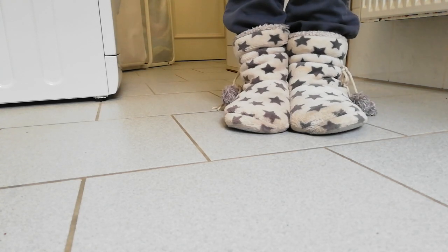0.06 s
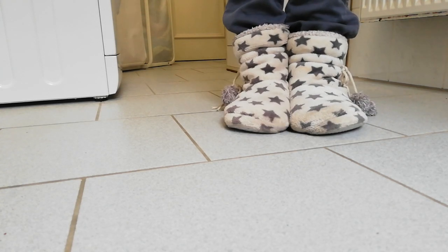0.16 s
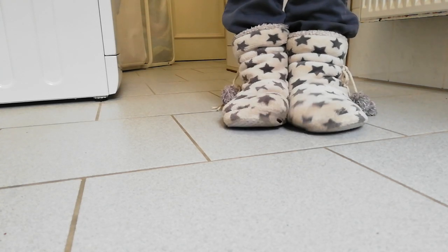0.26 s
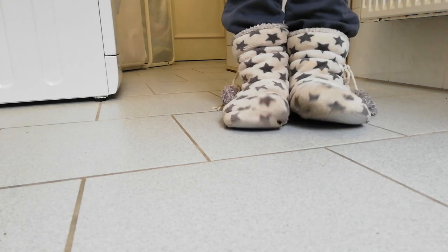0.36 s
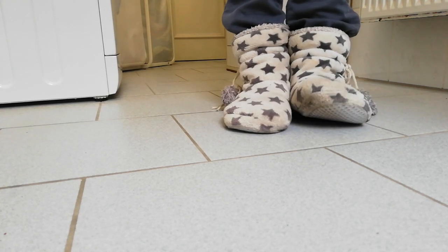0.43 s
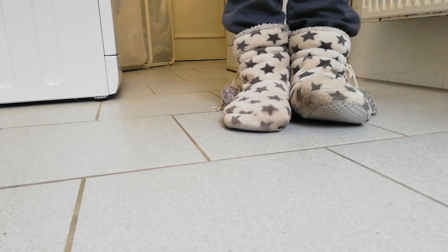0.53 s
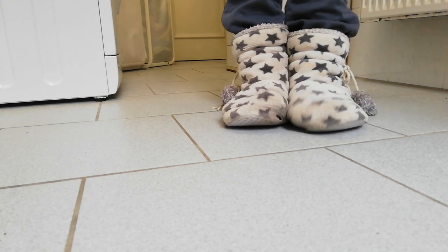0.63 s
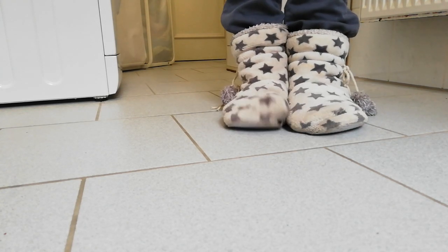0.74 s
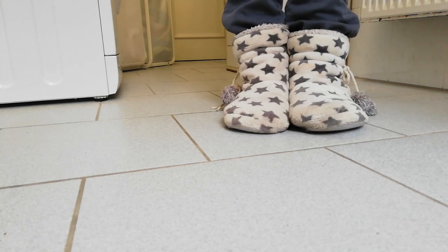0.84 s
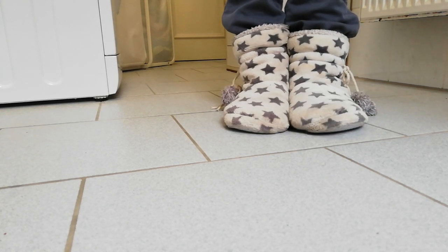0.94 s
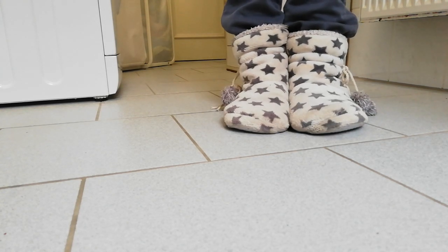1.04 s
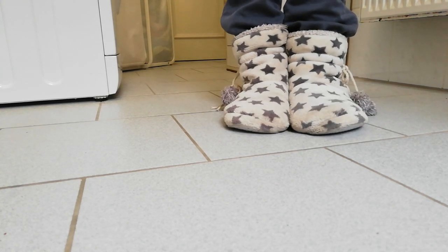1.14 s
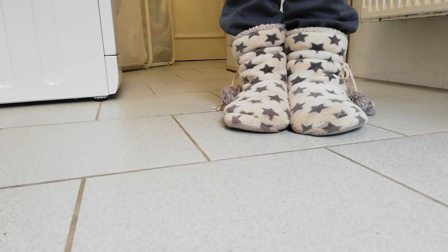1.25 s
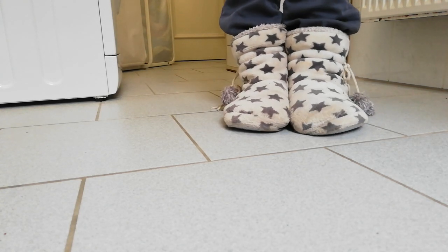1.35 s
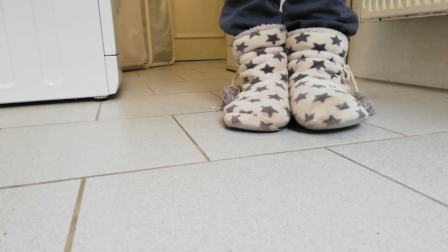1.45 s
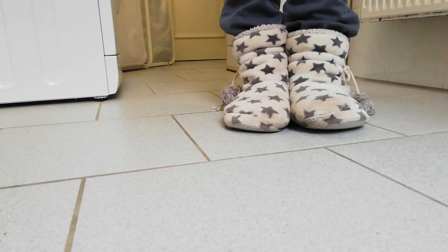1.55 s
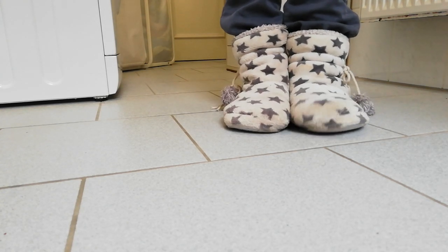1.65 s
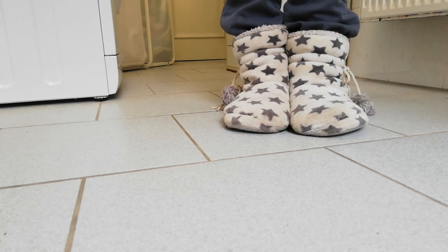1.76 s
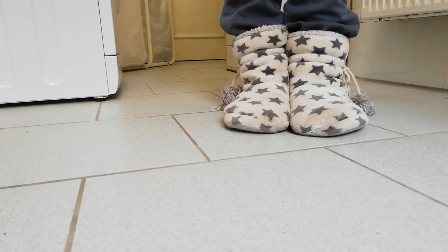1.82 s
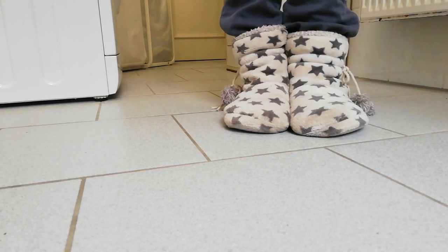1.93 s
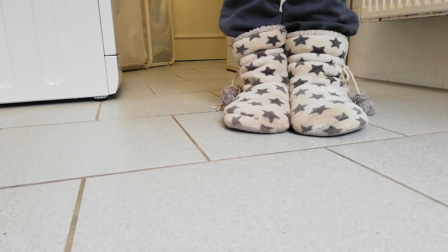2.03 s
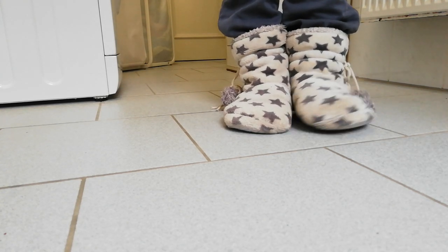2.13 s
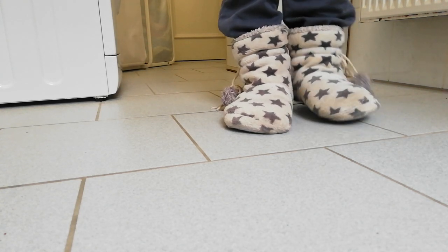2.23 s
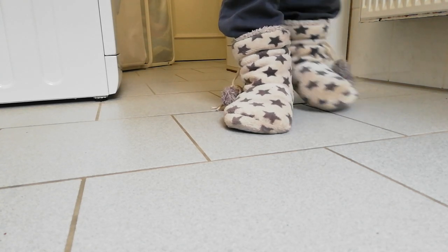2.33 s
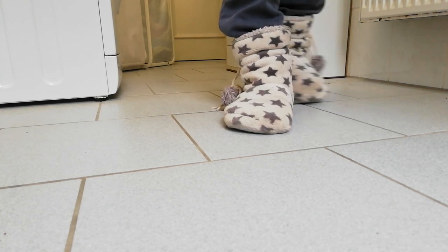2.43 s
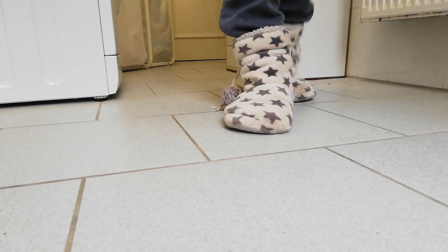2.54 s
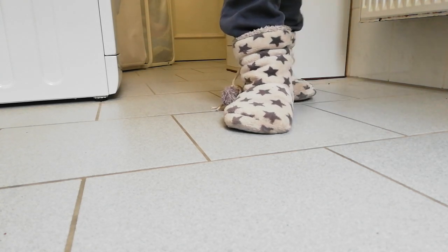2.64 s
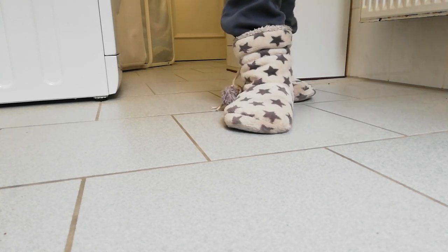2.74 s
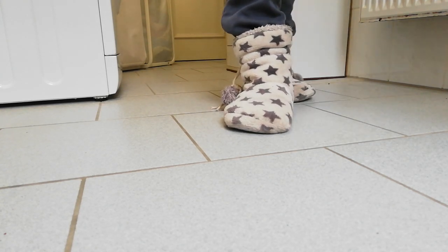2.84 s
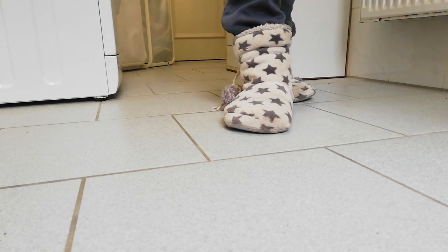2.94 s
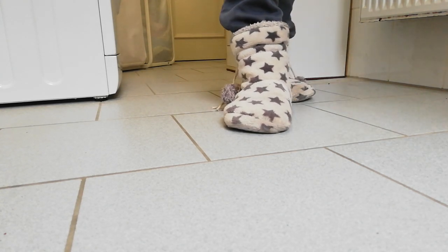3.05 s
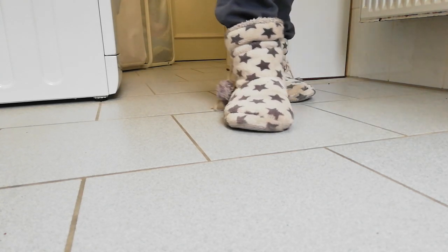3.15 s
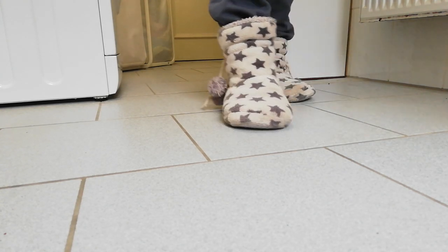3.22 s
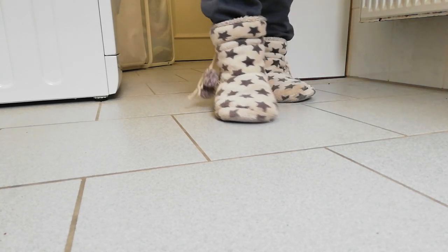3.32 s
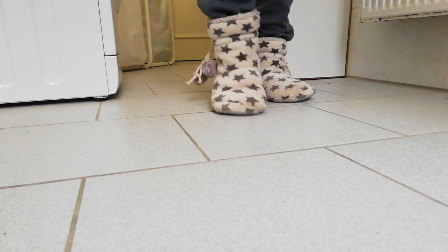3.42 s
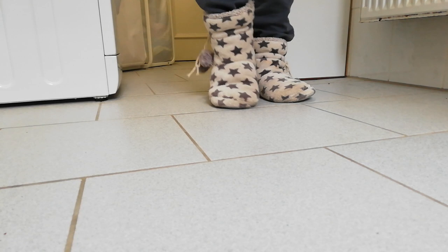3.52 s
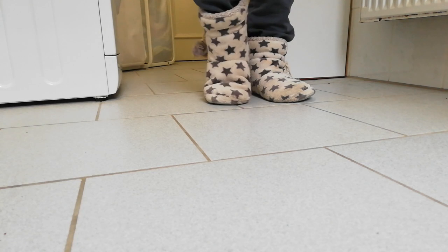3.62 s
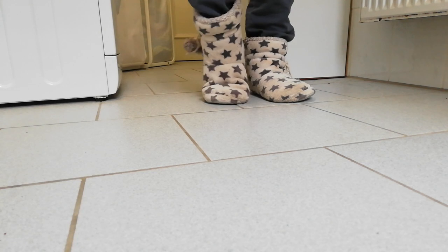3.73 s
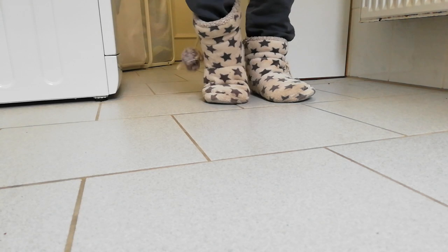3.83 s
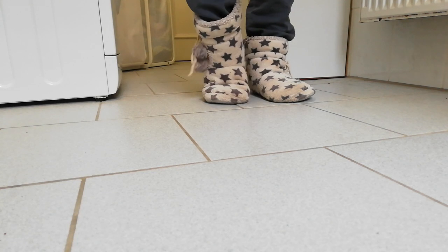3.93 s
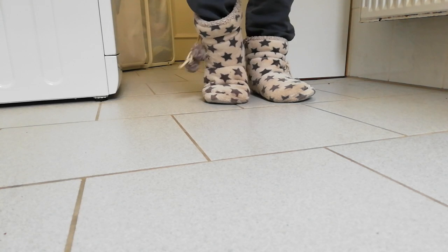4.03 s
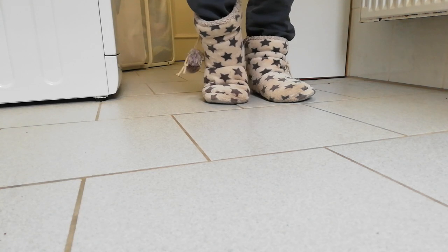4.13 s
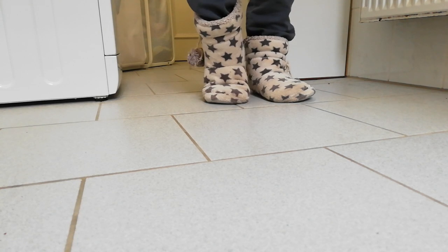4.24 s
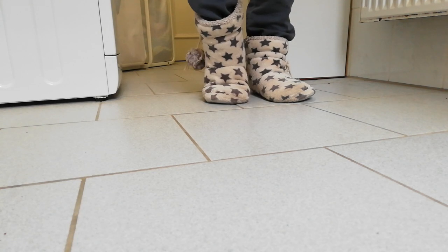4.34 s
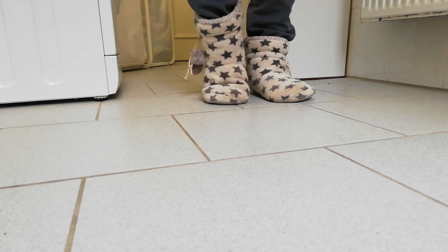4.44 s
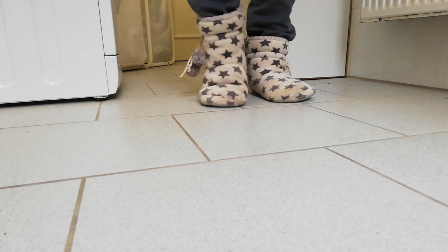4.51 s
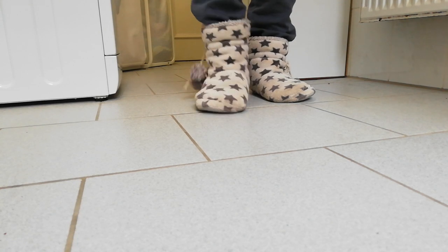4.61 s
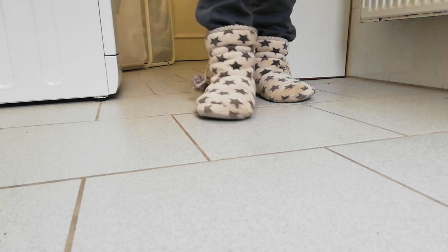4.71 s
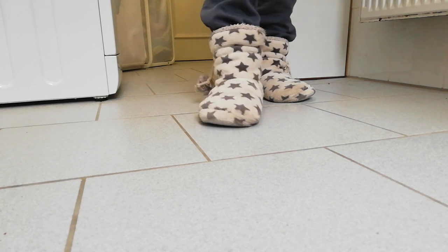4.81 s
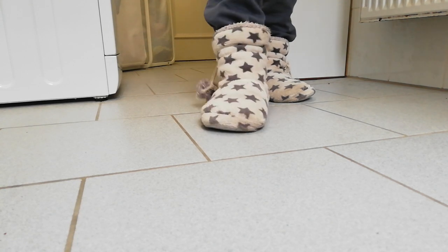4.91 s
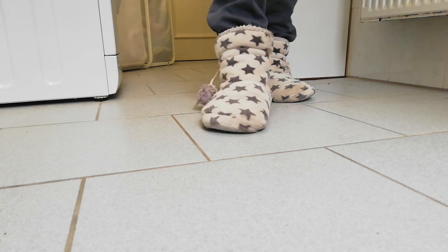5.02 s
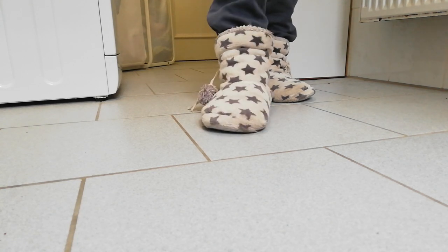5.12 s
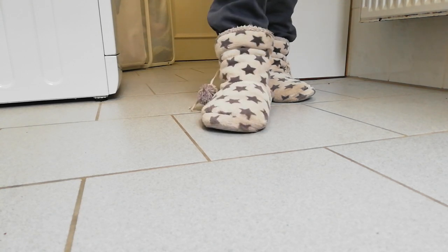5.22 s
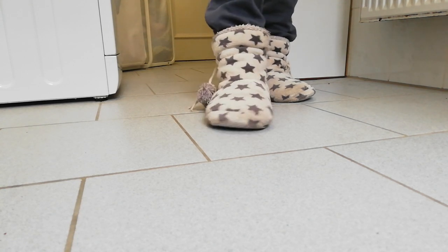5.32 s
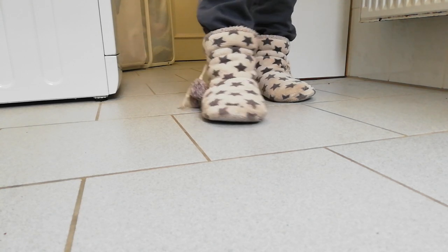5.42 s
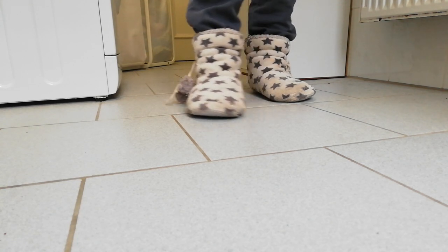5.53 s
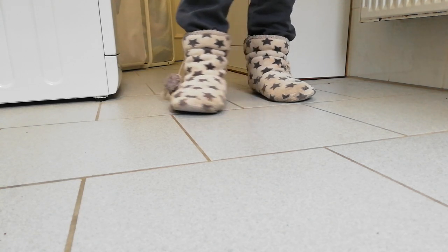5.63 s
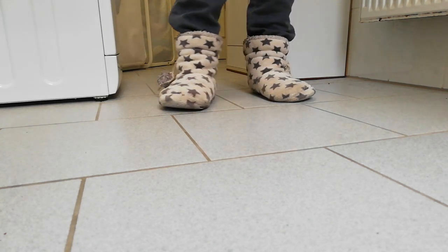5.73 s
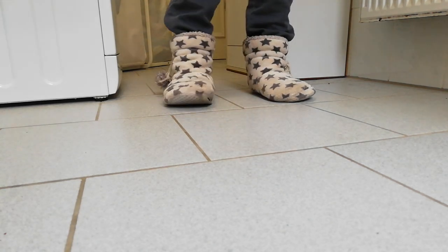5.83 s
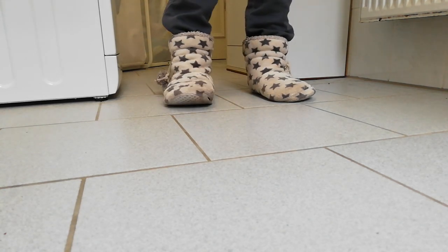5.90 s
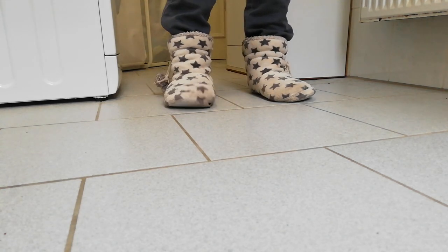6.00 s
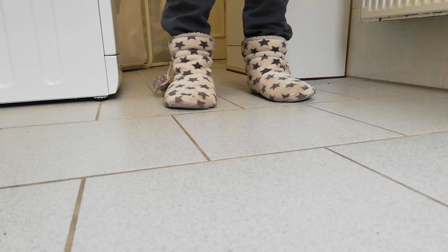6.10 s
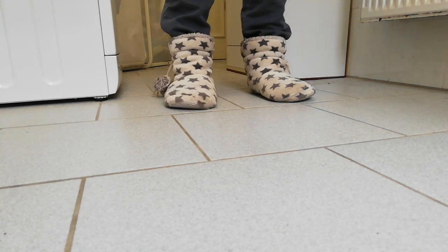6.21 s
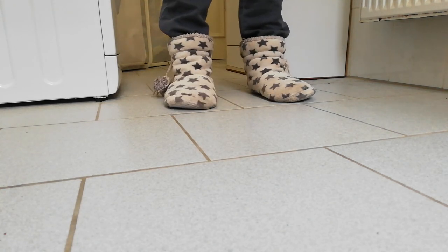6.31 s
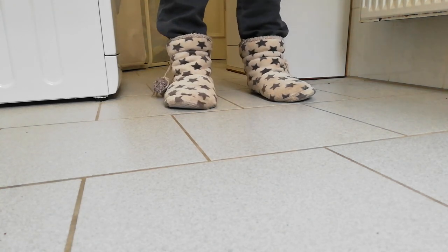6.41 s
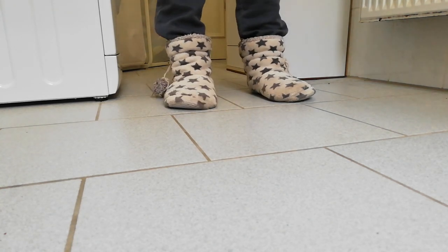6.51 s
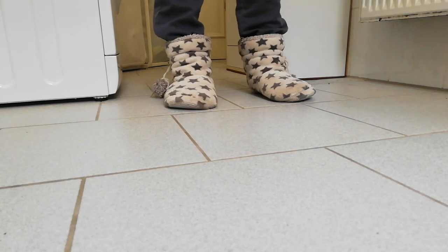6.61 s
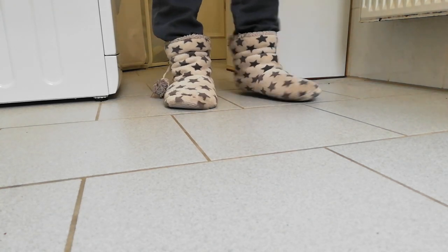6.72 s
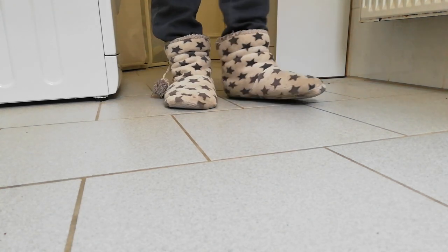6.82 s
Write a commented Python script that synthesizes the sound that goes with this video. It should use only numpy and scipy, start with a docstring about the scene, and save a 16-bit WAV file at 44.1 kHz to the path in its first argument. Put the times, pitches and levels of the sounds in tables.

```python
"""An appliance hums under steady air noise in a small hard room with ceramic tiles.
Soft boots with studded rubber soles shift and tap their toes, drag briefly, then one heel thuds at 2.6 s.
Longer slides follow from 3.2 to 6 s, while a faint second tone swells around 4 s; a last drag starts at 6.7 s.
Friction is thousands of random stud slips a second; taps and snapping studs are short dying rings.
A pair of microphone ports lies near the floor, each with a colour of its own."""
import sys
import numpy as np
from scipy import signal
from scipy.fft import rfft, irfft
from scipy.io import wavfile

SR = 44100
rng = np.random.default_rng(int(sys.argv[2]) if len(sys.argv) > 2 else 0)


def natural_amplitude(level_db):
    """Convert a level in decibels to a linear amplitude factor, elementwise."""
    exponent = np.asarray(level_db, float) / 20
    return 10 ** exponent


def unload_audio(sound):
    """Save the sound as a 16-bit wav file, at the path given as the first command line argument."""
    columns = np.transpose(np.atleast_2d(sound))
    # keep every value between -1 and 1, then stretch to whole-number steps
    steps = np.round(np.clip(columns, -1, 1) * 32767)
    wavfile.write(sys.argv[1], SR, steps.astype(np.int16))


N = 302526  # samples
HZ = np.arange(N // 2 + 1) * SR / N + 1e-3  # spectrum bins, kept above zero for the logarithm
LEFT_RIGHT = np.array([[.5], [-.5]])  # shares a left-right dB difference between the ports


def rms_one(x):
    """Scale to rms 1."""
    return x / np.sqrt(np.mean(x ** 2) + 1e-20)


def at_hz(points, hz):
    """Read a table along log frequency."""
    points_hz, values = np.transpose(points)
    return np.interp(np.log(hz), np.log(points_hz), values)


def coloured(x, gain):
    """Give a steady signal a spectrum."""
    return irfft(rfft(x) * gain, N)


def resonance(hz, width_hz):
    """Spectral bump of height 1 around one mode."""
    return 1 / (1 + (2 * (HZ - hz) / width_hz) ** 2)


def drift(rate_hz):
    """Slow random wander of rms 1."""
    return rms_one(coloured(rng.standard_normal(N), 1 / (1 + (HZ / rate_hz) ** 2)))


def ring(length, hz, t60):
    """A sine whose envelope starts at 1 and falls 60 dB in t60 seconds."""
    t = np.arange(length) / SR
    return np.sin(2 * np.pi * hz * t) * natural_amplitude(-60 * t / t60)


def room_tone(mid_db=-65.5):
    """Steady air and microphone noise: alike in the bass, changing in likeness with pitch above."""
    # Spectrum of the air. Each row: frequency in Hz, relative level in dB.
    air = [(20, -10.5), (49, -9.5), (70, -7.5), (90, -14.5), (126, -14), (252, -16.5), (383, -23),
           (492, -27), (908, -26.5), (1150, -23.5), (2000, -26.5), (4080, -30), (7750, -29), (11000, -33),
           (15600, -40.5)]
    # How alike the ports are. Each row: frequency in Hz, left-right correlation from -1 to 1.
    likeness = [(60, 0.96), (130, 0.78), (290, 0.16), (640, -0.78), (1410, 0.42), (3100, -0.2),
                (6820, 0.04), (15000, -0.03)]
    alike = np.clip(at_hz(likeness, HZ), -.99, .99)
    colour = natural_amplitude(at_hz(air, HZ))
    mid, side = rng.standard_normal((2, N))
    mid = coloured(mid, colour)
    side = coloured(side, colour * np.sqrt((1 - alike) / (1 + alike)))
    return natural_amplitude(mid_db) * (mid + side * [[1], [-1]]) / np.std(mid)


def rumble():
    """Low noise in the room's modes."""
    # Each row: mode in Hz, width in Hz, level in dB rms.
    modes = [(99.76, 11, -73), (54, 8, -80), (68, 8, -85), (120.5, 8, -82.5)]
    out = 0
    for hz, width_hz, db in modes:
        noise = coloured(rng.standard_normal(N), resonance(hz, width_hz))
        out = out + natural_amplitude(db) * rms_one(noise)
    return out


def hum(mains_hz=100.27, mains_db=-66, wander_rad=0.1):
    """A steady appliance tone that beats with the rumble around it, and a second that comes and goes."""
    # The faint second tone: centre in seconds, half length in seconds, pitch in Hz, level at centre in dB rms.
    passing_tone = (4, .55, 121.5, -71)
    centre_s, half_s, tone_hz, tone_db = passing_tone
    t = np.arange(N) / SR
    mains = natural_amplitude(mains_db) * np.sin(2 * np.pi * mains_hz * t)
    swell_db = tone_db - 20 * ((t - centre_s) / half_s) ** 4
    passing = natural_amplitude(swell_db) * np.sin(2 * np.pi * tone_hz * t + wander_rad * drift(3))
    return np.sqrt(2) * (mains + passing) + rumble()  # rms to peak


def thud(rise_s=.015):
    """The slab swings up slowly and dies; both ports hear it alike."""
    # Heel on the floor slab, then the weight settling.
    # Each row: start in seconds, level in dB before the soft rise, pitch in Hz, time to fall 60 dB in seconds.
    slab_blows = [(2.625, -42.5, 55, .17), (2.675, -46.5, 54, .3)]
    out = np.zeros(N)
    rise = 1 - np.exp(-np.arange(SR) / SR / rise_s)
    for s, db, hz, t60 in slab_blows:
        at = round(s * SR)
        out[at:at + SR] += natural_amplitude(db) * ring(SR, hz, t60) * rise
    return out


def toe_knocks(cycles=5.9):
    """Toe taps: each knock falls 60 dB within the same number of cycles, so high ones are shorter."""
    # Each row: start in seconds, level in dB before room and ports, pitch in Hz, left-right dB.
    toe_taps = [(0.6498, -46, 2000, -2), (.671, -40, 1100, 0), (1.436, -39, 1800, 7.5),
                (1.6158, -36, 1010, 1), (2.1772, -35.5, 2800, -9), (2.569, -29.5, 1720, 4.5),
                (2.572, -33, 1980, -19), (6.7039, -29, 4000, 0)]
    return [(s, db, hz, cycles / hz, pan_db) for s, db, hz, pan_db in toe_taps]


def tile_knocks(t60=0.027):
    """The tile answers a flat landing lower and longer."""
    # Each row: start in seconds, level in dB before room and ports, pitch in Hz.
    landings = [(1.6144, -45, 480), (2.569, -46.5, 292)]
    return [(s, db, hz, t60, 0) for s, db, hz in landings]


def stud_ticks(t60=0.0021):
    """Single studs snap free with a very short high ring."""
    # Each row: start in seconds, level in dB before room and ports, pitch in Hz, left-right dB.
    snaps = [(1.383, -34.5, 8200, -9), (1.4386, -27, 8300, -9.5), (1.477, -30.5, 8800, -13.5),
             (2.187, -30, 7000, 2), (2.62, -33, 6000, -5), (2.637, -23, 7500, 4), (3.3147, -16.5, 7000, 6),
             (3.8715, -46, 7500, 2), (4.5273, -21, 6000, 0), (5.4257, -15.5, 6900, 6),
             (5.4953, -22, 6500, -3)]
    return [(s, db, hz, t60, pan_db) for s, db, hz, pan_db in snaps]


def taps(rubber_hz=11000):
    """Knocks and ticks as dying rings, the pressure dropping first; soft rubber rounds the edge."""
    out, length = np.zeros((2, N)), 1500
    for s, db, hz, t60, pan_db in toe_knocks() + tile_knocks() + stud_ticks():
        at = round(s * SR)
        out[:, at:at + length] -= ring(length, hz, max(t60, .0005)) * natural_amplitude(db + pan_db * LEFT_RIGHT)
    rubber = signal.butter(4, rubber_hz, fs=SR, output="sos")
    return signal.sosfilt(rubber, out + 1e-18)


def stance():
    """Where the moving boot stands: the rows held from one movement to the next."""
    # Each row: start in seconds, delay of the right port in samples, treble left-right dB,
    # then the level of each of the four hollows in dB.
    stances = [(0, -3, -4.5, 5, 5, -3, 2), (1.1, -2.5, -6.5, -4, -8, -6, -5),
               (2.1, -2.5, -6, -3, -20, -1, -5), (2.5, -1.5, -9, 2, -1, -7, 12),
               (3.0, 0.5, -1, -12.5, 1.5, -8.5, -9.5), (4.3, 2.5, 0, 5.5, -9.5, -8.5, -13),
               (5.2, 2.5, 0.5, 6, -2.5, -7, -1), (6.5, -1.5, -5, 6, -4, -7, -14)]
    rows = np.array(stances)
    row_now = np.searchsorted(rows[:, 0], np.arange(N) / SR, "right").clip(1) - 1
    return rows[row_now, 1:].T


def drags(landing_db=-13, landing_s=0.012, skim_treble_db=2.5):
    """Squared gains of boots dragged over the tiles; the sole skims brightly before it carries weight."""
    # One curve a drag. Each point: time in seconds, friction in dB before the grip varies.
    slides = [
        [(2.158, -68), (2.175, -39.5), (2.2, -38), (2.23, -57), (2.28, -57), (2.36, -77)],
        [(3.15, -66), (3.178, -50), (3.23, -43.5), (3.33, -30.5), (3.38, -29), (3.49, -30), (3.55, -36),
         (3.62, -40.5), (3.7, -43.5), (3.74, -55.5), (3.85, -69)],
        [(4.482, -69), (4.494, -39.5), (4.53, -33), (4.62, -27.5), (4.7, -28.5), (4.78, -25.5), (4.84, -28.5),
         (4.96, -31), (5.0, -35), (5.04, -53.5), (5.15, -67)],
        [(5.322, -69), (5.342, -46.5), (5.37, -38.5), (5.42, -34), (5.51, -28), (5.58, -31), (5.65, -31),
         (5.71, -35), (5.78, -46)],
        [(5.7, -55), (5.76, -38), (5.8, -35.5), (5.86, -35), (5.89, -41), (5.92, -60), (6.03, -68)],
        [(6.67, -69), (6.686, -44), (6.705, -39), (6.73, -45.5), (6.8, -43.5), (6.83, -34), (6.87, -34.5)],
    ]
    # One row a drag: extra low dB from weight at start and at end, extra treble dB from speed at start and at end.
    loads = [(7, 12, 2, -4), (-3, 7, 1.5, 4.5), (-7, 5.2, 1.5, -4), (6, 6.7, 3, 0), (10, 7.6, -5.5, 5),
             (3, 5, -1.5, 3)]
    t, power = np.arange(N) / SR, 0
    for curve, (low_db, low_end_db, high_db, high_end_db) in zip(slides, loads):
        s, db = np.transpose(curve)
        ends = s[[0, -1]]
        skim = np.exp(-np.abs(t - s[1]) / landing_s)
        weight_db = np.interp(t, ends, [low_db, low_end_db]) + landing_db * skim
        speed_db = np.interp(t, ends, [high_db, high_end_db]) + skim_treble_db * skim
        friction_db = np.interp(t, s, db, -200, -200)
        power = power + natural_amplitude(friction_db + [0 * t, weight_db, speed_db]) ** 2
    return power


def scuffs():
    """Squared gains of short scuffs and slow shifts of the sole, straight in dB up and down."""
    # Each row: peak in seconds, friction in dB before the grip varies, seconds to rise 20 dB,
    # seconds to fall 20 dB, extra low dB, extra treble dB.
    shifts = [(.35, -67, 0.38, 0.6, 5, 4.5), (.66, -58.5, 0.0421, 0.0837, 3, -3),
              (.725, -61.5, 0.12, .05, 10, 4), (.85, -63, .1, 0.13, 0, 3), (1.3, -53.5, .1, .12, -8, -1.5),
              (1.385, -48, .05, 0.05, 3, 2), (1.44, -51.5, .1, 0.0747, 6.5, -3),
              (1.5, -55.5, 0.12, 0.1, -4, 3.5), (1.59, -63, .15, .1, 3, 10),
              (1.618, -57.5, .015, .05, 22, -3), (1.78, -75.5, 0, 0.5, 0, 11.5),
              (2.572, -38, 0.0013, 0.0325, 8, -3), (2.632, -40, 0.0427, .012, 7.5, 6),
              (2.68, -52, .04, 0.1, 8.5, 0), (2.78, -68, 0.4, 0.7, 2, 3), (4.1, -73.5, 0.7, 0.06, 0, 4),
              (6.28, -75, 1, 0.5, 2, 6.5)]
    t, power = np.arange(N) / SR, 0
    for s, db, rise_s, fall_s, weight_db, speed_db in shifts:
        shape_db = db - 20 * np.where(t < s, (s - t) / rise_s, (t - s) / fall_s)
        power = power + natural_amplitude(shape_db.clip(-200) + np.array([[0], [weight_db], [speed_db]])) ** 2
    return power


def contact():
    """Gains of the middle, the lows and the treble of the friction, all movements added in power."""
    return np.sqrt(drags() + scuffs())


def rubbing(slips_per_s=4000, spread_db=2.5, flutter_db=1.0, count=4, weight_hz=740, speed_hz=5430):
    """Studs stick and slip at random at several places; load fills the lows, speed the treble."""
    # Colour of the sole. Each row: frequency in Hz, relative level in dB.
    sole = [(120, -30.5), (255, -21.5), (400, -14.5), (700, -10.5), (1100, -4), (2000, -3.5), (2800, -5.5),
            (4000, -2), (5700, -3.5), (7800, -3), (9000, -4.5), (10500, -12), (12500, -19), (14500, -25.5),
            (15600, -43)]
    # Air between sole, floor and furniture. Each row: pitch in Hz, width in Hz.
    hollows = [(882, 64), (1105, 245), (2860, 460), (330, 96)]
    friction, weight, speed = contact()
    slip_db = spread_db * np.minimum(rng.exponential(1, (count, 1, N)), 3)
    sizes = natural_amplitude(slip_db) * rng.standard_normal((count, 1, N))
    slips = sizes * (rng.random((count, 1, N)) < slips_per_s / SR)
    colour = natural_amplitude(at_hz(sole, HZ))
    colour = colour / np.std(coloured(slips[0], colour)) / np.sqrt(count)
    low = 1 / (1 + (HZ / weight_hz) ** 4)
    high = 1 / (1 + (speed_hz / HZ) ** 4)
    body = coloured(slips, colour * (1 - low) * (1 - high))
    pan_db, *hollows_db = stance()[1:]
    for (hz, width_hz), db in zip(hollows, hollows_db):
        body = body + natural_amplitude(db) * coloured(slips, colour * resonance(hz, width_hz))
    body = body * friction + coloured(slips, colour * low) * weight
    hiss = coloured(slips, colour * high) * speed * natural_amplitude(pan_db * LEFT_RIGHT)
    # grip comes and goes at each place
    grip_db = flutter_db * np.array([[drift(25) + 0.92 * drift(5.6)] for place in slips])
    # the whole foot jerks along, heard most in the treble
    surge_db = 1.17 * drift(17)
    return (body + hiss * natural_amplitude(surge_db)) * natural_amplitude(grip_db - 5.0 + 0.54 * surge_db)


def tail(x, room_db, gap_s=.002):
    """The diffuse answer of the room to one place on the floor, dying octave by octave."""
    # Decay of the room. Each row: frequency in Hz, time to fall 60 dB in seconds.
    decay = [(200, 0.32), (1000, 0.25), (4000, 0.22), (12000, 0.13)]
    t, edges = np.arange(SR // 2) / SR, 60 * 2. ** np.arange(9)
    echoes = 0
    for low, high in zip(edges, edges[1:]):
        octave = signal.butter(2, [low, high], "band", fs=SR, output="sos")
        band = signal.sosfilt(octave, rng.standard_normal((2, len(t))))
        t60 = at_hz(decay, np.sqrt(low * high))
        band = band * natural_amplitude(-60 * t / t60) * (t > gap_s)
        energy = np.sum(band ** 2, axis=1, keepdims=True)
        echoes = echoes + band * np.sqrt((high - low) / (SR / 2) / energy)
    return natural_amplitude(room_db) * signal.fftconvolve(x, echoes, axes=1)[:, :N]


def room(places, tapping, room_db=3.5, tap_room_db=-3, alike_hz=192, wide_db=3.5, wide_hz=900):
    """Direct sound, a shade apart at the two ports, and a tail of its own for every place."""
    left, right = sum(places) + tapping
    delay = np.round(stance()[0]).astype(int)
    direct = np.array([left, right[np.clip(np.arange(N) - delay, 0, N - 1)]])
    # a tap under the toe faces the ports and sounds drier
    tails = sum(tail(x, room_db) for x in places) + tail(tapping, tap_room_db)
    # the ports differ little in the deep bass, where both hear one wave; the boost fades above wide_hz
    widening = natural_amplitude(wide_db / (1 + (HZ / wide_hz) ** 2)) / (1 + (alike_hz / HZ) ** 2)
    apart = coloured((tails[0] - tails[1]) / 2, widening)
    return direct + tails.mean(axis=0) + apart * [[1], [-1]]


def scene():
    """Boots in the room as each port colours them, over the steady sounds."""
    # Colour of the ports. Each row: frequency in Hz, left-right dB.
    ports = [(300, 1), (1200, 0.5), (2400, 2.5), (3300, 2), (4800, 6.5), (5900, 4.5), (7400, 10.5),
             (8600, 8.5), (9400, -2), (10400, -6), (13000, -1), (15500, -6)]
    boots = coloured(room(rubbing(), taps()), natural_amplitude(at_hz(ports, HZ) * LEFT_RIGHT))
    return boots + thud() + room_tone() + hum()


def top_cut(x):
    """Nothing passes above the cut-off."""
    return signal.sosfilt(signal.butter(12, 15700, fs=SR, output="sos"), x)


def record(dry):
    """Deliver the finished mix of both ports."""
    return top_cut(dry)


dry = scene()
out = record(dry)
unload_audio(out)
```